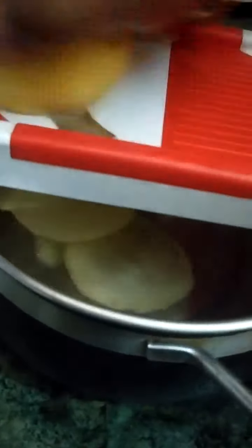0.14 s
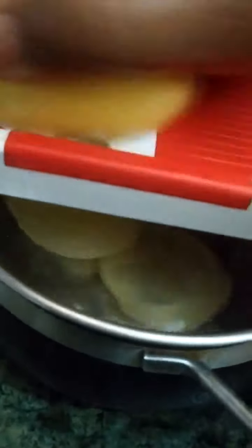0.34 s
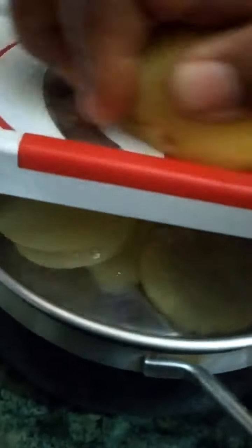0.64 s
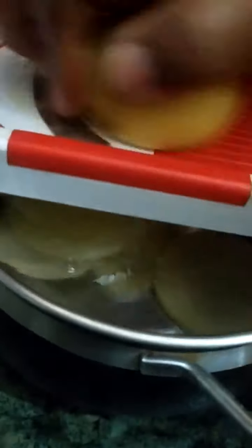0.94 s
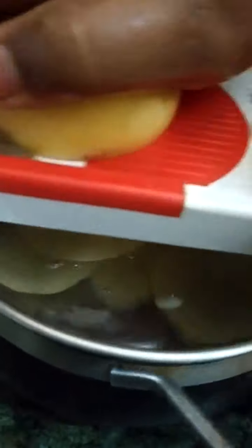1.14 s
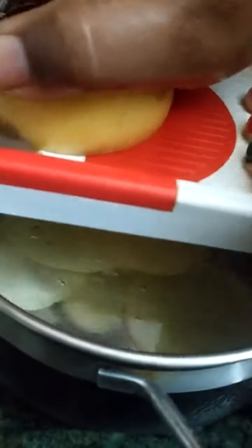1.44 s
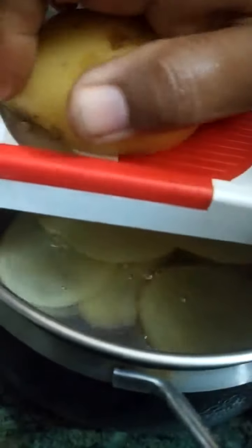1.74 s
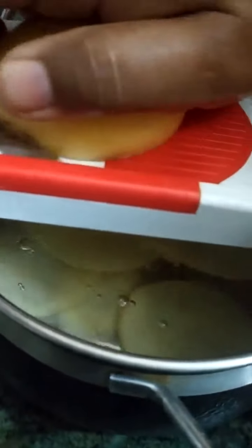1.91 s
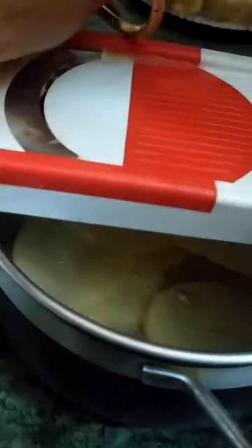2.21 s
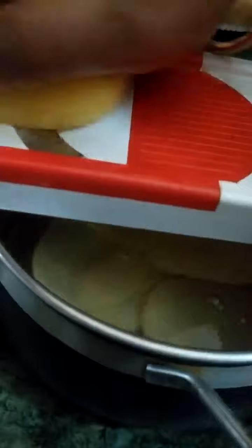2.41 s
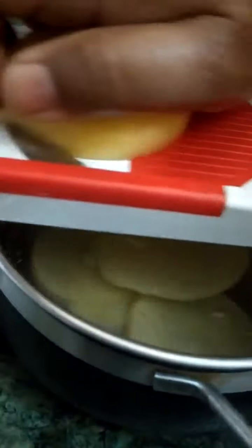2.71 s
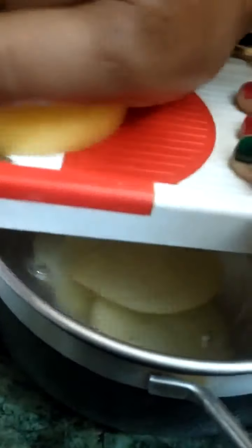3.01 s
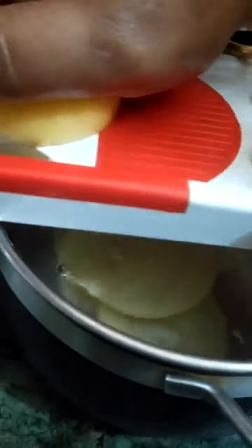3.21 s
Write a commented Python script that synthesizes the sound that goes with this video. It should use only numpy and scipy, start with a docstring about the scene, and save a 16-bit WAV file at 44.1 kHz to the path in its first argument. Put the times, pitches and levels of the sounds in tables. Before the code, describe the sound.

A potato is sliced on a plastic slicer, heard close in mono in a quiet kitchen. Wet, hollow slaps at about 0.15, 0.5 and 0.9 s each lead into a crisp, hissing rasp. Plastic clacks on the rim at 0.7 and 1.1 s; soft sliding follows. A cut rasps near 2.0 s, then double knocks, a weaker slap and short cuts at 2.6 and 3.0 s, fading into faint rubbing.

```python
"""In a kitchen, close to a mono microphone, a raw potato is sliced on a plastic mandoline across a steel pot.
The wet potato slaps the deck (noise bursts and damped modes), then slides on it (shaped grains with a low hum).
Each cut rasps as a dense run of bursting cells: random impulses shaped into hiss, fizz and tearing.
The slicer thumps under potato and hand, knocks on the rim (damped modes and clacks), and wet smacks snap.
A weak room answer and a quiet noise floor lie underneath."""
import sys
import numpy as np
from scipy import signal
from scipy.fft import rfft, irfft, next_fast_len
from scipy.io import wavfile
from scipy.ndimage import uniform_filter1d, map_coordinates

SR = 44100
rng = np.random.default_rng(int(sys.argv[2]) if len(sys.argv) > 2 else 0)


def wrap_up_sound(samples):
    """Save the sound to the file named by the first command line argument, as 16-bit audio."""
    columns = np.atleast_2d(samples).T
    # keep every value between -1 and 1, then stretch to whole-number steps
    tamed = np.clip(columns, -1, 1)
    steps = np.round(tamed * 32767).astype(np.int16)
    wavfile.write(sys.argv[1], SR, steps)


N = 147735
T = np.arange(N) / SR  # time [s]
FFT_SIZE = next_fast_len(N + 8192)
HZ = np.fft.rfftfreq(FFT_SIZE, 1 / SR)

# Low shaking of the slicer: (frequency [Hz], relative level [dB])
SHAKE_TONE = [(25, -14), (50, -13), (72, -5), (98, 6), (118, -11.5), (133, 1.5), (165, -28.5), (218, -2.5),
              (250, -14.5), (330, -13), (600, -89)]
# Hollow body of the slicer, driven by the potato: (frequency [Hz], relative level [dB])
BODY_TONE = [(150, -7.5), (340, -16.5), (470, -4.5), (650, -3.5), (1100, -11), (2500, -60)]
# Main resonance of that body: (frequency [Hz], width [Hz], lift [dB])
BODY_PEAK = [(810, 120, 12)]


def amp(db):
    """Decibels to gain."""
    return 10 ** (np.asarray(db) / 20)


def unit(x):
    """Scale to rms 1."""
    return x / np.sqrt(np.mean(x ** 2) + 1e-20)


def filtered(x, gain):
    """Multiply the spectrum of x by a gain on the frequency grid."""
    return irfft(rfft(x, FFT_SIZE) * gain, FFT_SIZE)[:N]


def coloured(x, tone, peaks=()):
    """Shape x by a tone curve and resonances, with the deepest bass removed, at rms 1."""
    hz_points, db_points = np.transpose(tone)
    shape_db = np.interp(np.log(HZ + 1), np.log(hz_points), db_points)
    for hz, width, lift in peaks:
        shape_db = shape_db + lift / (1 + (2 * (HZ - hz) / width) ** 2)
    bass_cut = HZ ** 2 / (HZ ** 2 + 20 ** 2)
    return unit(filtered(x, amp(shape_db) * bass_cut))


def noise():
    """White noise."""
    return rng.standard_normal(N)


def wobble(rate):
    """A smooth random curve, rate knots a second."""
    return map_coordinates(rng.standard_normal(2000), [T * rate], mode="wrap")


def grains(rate, spread_db):
    """Random one-sample impulses of either sign and uneven size, rate a second."""
    hits = rng.random(N) < rate / SR
    return hits * np.sign(noise()) * amp(spread_db * noise())


def patchy(x):
    """Narrow peaks and hollows drift through the spectrum, as reflections off the moving hand do."""
    depth_db = 3.5
    spectrum = signal.stft(x, nperseg=1024)[2]
    field = rng.standard_normal(spectrum.shape)
    for _ in range(2):
        field = uniform_filter1d(field, size=5, axis=0)  # across frequency
        field = uniform_filter1d(field, size=7, axis=1)  # across time
    gain = amp(depth_db * np.minimum(unit(field), 1.4))
    return unit(signal.istft(spectrum * gain, nperseg=1024)[1][:N])


def strike(s, rise, t60):
    """Envelope that swells up to time s and then dies away by 60 dB in t60."""
    swell = np.exp(np.minimum(T - s, 0) / rise)
    return swell * amp(-60 * np.maximum(T - s, 0) / t60)


def ring(s, modes, rise):
    """Damped modes set off at time s, each level a little random, sounding for half a second at most."""
    scatter_db = 1.2
    t = np.maximum(T - s, 0)
    on = (t > 0) & (t < .5)
    out, t = np.zeros(N), t[on]
    for hz, db, t60 in modes:
        decay = amp(db + scatter_db * rng.standard_normal() - 60 * t / t60)
        out[on] += decay * np.sin(2 * np.pi * hz * t) * (1 - np.exp(-t / rise))
    return out


def still_kitchen():
    """Steady, mostly low noise of the still kitchen."""
    # Tone of the noise: (frequency [Hz], relative level [dB])
    floor_tone = [(30, 13), (90, -10.5), (300, 1), (800, -13.5), (3000, -23.5), (16000, -55)]
    return amp(-65) * coloured(noise(), floor_tone)


def room_answer(x):
    """A short answer from the walls: decaying noise, thin in the bass."""
    t60_s, low_hz = .2, 320
    t = T[:SR // 2]
    tail = rng.standard_normal(len(t)) * amp(-60 * t / t60_s) * (t > .003)
    wet = signal.fftconvolve(x, tail / np.linalg.norm(tail))[:N]
    return filtered(wet, HZ ** 2 / (HZ ** 2 + low_hz ** 2))


def smacks():
    """Juice snaps as wet surfaces part: short bursts of bright noise."""
    # Small wet smacks: (time [s], level [dB])
    smack_hits = [(0.118, -38.5), (0.629, -25), (0.832, -35), (0.893, -43), (1.817, -49.5), (2.402, -45),
                  (2.129, -37), (2.574, -38), (3.286, -50)]
    # Their tone: (frequency [Hz], relative level [dB])
    smack_tone = [(1000, -16.5), (4000, -11.5), (6300, -3), (8000, -8.5), (12000, -5.5), (16000, -13)]
    envelope = sum(amp(db) * strike(s, rise=0.0017, t60=0.04) for s, db in smack_hits)
    return envelope * patchy(coloured(noise(), smack_tone))


def thumps():
    """Landings of the potato and pushes of the hand bend the slicer: low damped modes, tuned for each."""
    # Thumps: (time [s], pitch [Hz], level [dB], lift of the upper modes [dB])
    thump_hits = [(0.167, 98.7, -27.5, 10), (0.526, 100, -25.5, -1), (0.912, 102.2, -29, 9.5),
                  (2.328, 98.4, -37.5, 4.5), (2.461, 96.2, -32, -4), (2.606, 90, -37.5, -13),
                  (2.991, 91.3, -36.5, -14), (3.154, 99.5, -45, -8)]
    # Bending modes: (multiple of the pitch [ratio], relative level [dB], t60 [s])
    bending_modes = [(.76, -3.5, 0.29), (0.998, 0, 0.33), (1.33, -14, 0.22), (1.8, -14, 0.16),
                     (2.17, -6, 0.17), (2.65, -8.5, 0.047)]
    upper_hz = 120
    out = np.zeros(N)
    for s, pitch, db, upper_db in thump_hits:
        modes = []
        for multiple, level, t60 in bending_modes:
            hz = multiple * pitch
            modes.append((hz, level + upper_db * (hz > upper_hz), t60))
        out += amp(db) * ring(s, modes, rise=.003)
    return out


def knocks():
    """Plastic on the steel rim: a dry clack with a faint rattle over damped rings of body, deck and blade."""
    # Knocks: (time [s], body ring level [dB], deck ring level [dB], clack level [dB])
    knock_hits = [(.002, -34, -42, -43.5), (.131, -30, -33, -34), (.232, -31, -37, -37),
                  (.728, -20, -66, -22), (.7505, -27.5, -54, -30), (.982, -25, -33, -38),
                  (1.078, -23.5, -29.5, -27.5), (1.123, -31.5, -82, -55), (1.183, -40.5, -70, -75),
                  (1.295, -42.5, -45, -58), (1.785, -46, -50, -58), (2.058, -28, -30, -27),
                  (2.1305, -27, -27, -25), (2.1455, -33, -31.5, -33)]
    # Modes of slicer body, flat deck and steel blade: (frequency [Hz], relative level [dB], t60 [s])
    body_modes = [(733, -7.5, 0.083), (818, 1.5, 0.052)]
    deck_modes = [(1132, -16.5, 0.022), (1564, -7, 0.071), (2230, -1.5, 0.038), (2357, 0.5, 0.036)]
    blade_modes = [(4225, -3, 0.072), (7420, -3.5, 0.057), (9830, 2, 0.037)]
    # Tone of the clack: (frequency [Hz], relative level [dB])
    clack_tone = [(300, -6), (600, -22), (800, 7), (1150, 5), (1800, -2), (2350, 10), (2800, 1.5),
                  (3200, 6.5), (4400, 1.5), (5400, -4), (7000, 0.5), (10000, -33), (16000, -43)]
    blade_db, rattle_db = -9.5, -23.5  # both relative to the clack
    rings, clack = np.zeros((2, N))
    for s, body_db, deck_db, clack_db in knock_hits:
        rings += amp(body_db) * ring(s, body_modes, rise=0.00074)
        rings += amp(deck_db) * ring(s, deck_modes, rise=0.00085)
        rings += amp(clack_db + blade_db) * ring(s, blade_modes, rise=0.00058)
        rattle = amp(rattle_db) * strike(s, rise=0.0003, t60=0.27)
        clack += amp(clack_db) * (strike(s, rise=0.00057, t60=0.026) + rattle)
    return rings + clack * patchy(coloured(noise(), clack_tone))


def thud(s):
    """A tone falling from a knock to a low boom, as a bending wave from the impact spreads through the slicer."""
    start_hz, end_hz, fall_s, t60_s = 854, 102.6, 0.00677, .12
    dip_hz, dip_width_hz = 325, 110  # the thud is thin around this frequency
    t = np.maximum(T - s, 0)
    cycles = end_hz * t + (start_hz - end_hz) * fall_s * (1 - np.exp(-t / fall_s))
    tone = np.sin(2 * np.pi * cycles) * amp(-60 * t / t60_s) * (1 - np.exp(-t / 0.0018))
    b, a = signal.iirnotch(dip_hz, dip_hz / dip_width_hz, SR)
    return signal.lfilter(b, a, tone)


def slaps():
    """The potato lands: a wet crack with a splashy tail, soft flesh noise, a hollow clop and a falling thud."""
    # Landings: (time [s], wet slap [dB], hollow clop [dB], falling thud [dB], lift of upper clop modes [dB])
    landings = [(0.1573, -17.5, -14.5, -21, -2.5), (0.5205, -19.5, -18.5, -23, -8),
                (0.9062, -20, -20.5, -20.5, -7), (2.4507, -28.5, -34.5, -35, 13)]
    # Tones of the wet crack and of soft flesh hitting plastic: (frequency [Hz], relative level [dB])
    wet_tone = [(300, -31), (1300, 7), (2300, -3), (2800, -3.5), (3500, 0), (5400, -3.5), (7500, 0),
                (10000, 4.5), (12000, -7), (16000, -9.5)]
    flesh_tone = [(50, -34), (130, 6), (220, 2), (450, 6.5), (900, 10.5), (1400, -33), (2200, -1),
                  (5000, -38)]
    # Modes of the hollow clop: (frequency [Hz], relative level [dB], t60 [s])
    clop_modes = [(439, -19, 0.27), (583, -19, 0.016), (817, -1, 0.055), (1397, -8, 0.046)]
    rise_s, splash_db, flesh_db = 0.0018, -19, -13.5  # levels relative to the wet slap
    upper_hz, lead_s = 1150, 0.00164  # clop and thud start just ahead of the crack's peak
    wet, flesh, clop = np.zeros((3, N))
    for s, wet_db, clop_db, thud_db, upper_db in landings:
        splash = amp(splash_db) * strike(s, rise_s, t60=0.21)
        wet += amp(wet_db) * (strike(s, rise_s, t60=0.024) + splash)
        flesh += amp(wet_db + flesh_db) * strike(s, rise=0.00032, t60=0.19)
        modes = [(hz, db + upper_db * (hz > upper_hz), t60) for hz, db, t60 in clop_modes]
        clop += amp(clop_db) * ring(s - lead_s, modes, rise=0.0013)
        clop += amp(thud_db) * thud(s - lead_s)
    crack = wet * patchy(coloured(noise(), wet_tone))
    return crack + flesh * coloured(noise(), flesh_tone) + clop


def sliding():
    """The wet cut face rubs over the ribbed deck; the body hums unevenly and one judder rings."""
    # Course of the sliding, before the trim of each layer: (time [s], level [dB])
    slide_course = [(0, -45.5), (.04, -46.5), (.14, -39.5), (.22, -41), (.4, -49.5), (.46, -46),
                    (.5, -50.5), (.58, -48.5), (.875, -47.5), (.893, -32), (.94, -52), (1.17, -47.5),
                    (1.26, -65.5), (1.3, -44.5), (1.35, -47), (1.42, -48), (1.49, -66.5), (1.56, -52.5),
                    (1.7, -56), (1.75, -64), (1.83, -51), (1.87, -51.5), (1.93, -45.5), (2.1, -46.5),
                    (2.2, -52.5), (2.29, -47.5), (2.435, -51.5), (2.49, -47), (2.56, -56), (2.66, -55.5),
                    (2.785, -47.5), (2.82, -42), (2.95, -51), (3.1, -52.5), (3.22, -55), (3.26, -64),
                    (3.35, -58)]
    # Tone of the rub: (frequency [Hz], relative level [dB])
    rub_tone = [(200, -13), (500, -12.5), (1200, -4.5), (2400, -2.5), (2800, -5), (4200, -4.5), (5400, -7),
                (6800, -3), (9800, -1), (12000, -8), (16000, -15.5)]
    rub_db, stick_db = -4, -9.5  # trims of rub and hum
    rumble_db, rumble_follows = -55, 0.9  # shaking follows most of the course's rise and fall in dB
    db = np.interp(T, *np.transpose(slide_course))
    rub = patchy(coloured(grains(4000, spread_db=3), rub_tone)) * amp(db + rub_db + 2.9 * wobble(60))
    # The body hums in fits as the potato sticks and slips.
    hum = coloured(noise(), BODY_TONE, BODY_PEAK) * amp(db + stick_db + 1.5 * wobble(40))
    judder = ring(2.787, [(223, -43.5, 0.76)], rise=0.0077)  # mode: Hz, dB, t60 in s
    shaking = coloured(noise(), SHAKE_TONE) * amp(rumble_db + rumble_follows * (db - db.mean()))
    return rub + hum + judder + shaking


def cut_levels():
    """Gains of hiss, fizz, tearing, body and shaking: the blade bites, its load changes mid-cut, it lets go."""
    # Passes through the blade: (time at half the attack [s], length [s], attack [s], level [dB],
    # tearing flesh over that [dB], hollow body over that [dB], swell at the potato's widest [dB],
    # change from start to end [dB], release [dB/s])
    cuts = [(0.236, 0.11, 0.017, -36, -9, -6.5, 6.5, -1.5, 480),
            (0.603, 0.15, 0.0038, -38.5, -4.5, -3.5, 8.5, -3, 324),
            (0.983, 0.11, 0.011, -33, -9.5, -6.5, -3.5, -5, 255),
            (1.961, 0.12, 0.0087, -41.5, -3, -5.5, 10, -1, 398),
            (2.571, 0.068, 0.0034, -36.5, -5, -6.5, 1, -7, 244),
            (2.975, 0.068, 0.0093, -42.5, -3.5, -3, 6.5, 0.5, 468)]
    flatness = 3.45  # exponent: higher holds the swell longer
    fizz_db, fizz_swell = -16.5, 2.34  # finest spray of cells, changing more than the hiss
    crunch_swell = 0.29  # share of the swell in tearing and body
    shake_db, shake_swell = -8.5, 0.59
    levels = np.zeros((5, N))
    for s, length, attack, db, flesh_db, body_db, swell_db, change_db, release in cuts:
        progress = np.clip((T - s) / length, 0, 1)
        swell = swell_db * (1 - abs(2 * progress - 1) ** flatness)
        push = crunch_swell * swell
        bite = np.clip((T - s) / attack + .5, 0, 1)
        letting_go_db = release * np.maximum(T - s - length, 0)
        force = amp(db + change_db * progress - letting_go_db) * bite
        levels += force * amp([swell, fizz_swell * swell + fizz_db, push + flesh_db,
                               push + body_db, shake_swell * swell + shake_db])
    return levels


def burst_cells():
    """Dense bursting cells at the edge, with coarse fibres snapping more rarely among them."""
    spread_db = 2.5
    fibres = amp(-11) * unit(grains(450, spread_db))
    return lambda: unit(grains(13000, spread_db)) + fibres  # new cells each call, same fibres


def blade():
    """Cells burst and fibres snap at the edge; tearing flesh drives deck and body and shakes the slicer."""
    # Spectra of bursting cells, of their finest spray and of tearing flesh: (frequency [Hz], relative level [dB])
    hiss_tone = [(500, -39), (2000, -7), (3300, -10), (4500, 5), (5400, -3), (7000, 4), (9700, 2.5),
                 (11000, -2), (13000, -1), (16000, -18)]
    fizz_tone = [(4000, -43), (8000, -15), (10000, 2), (13000, -1), (16000, -0.5)]
    crunch_tone = [(400, -51), (1150, -14.5), (2400, -7), (2800, -11), (3200, -3.5), (4500, -24),
                   (7000, -40), (16000, -32)]
    # Deck resonances over the tearing: (frequency [Hz], width [Hz], lift [dB])
    deck_peaks = [(1530, 200, 3), (2380, 220, 6)]
    cells = burst_cells()
    waver = amp(.6 * wobble(140))
    hiss = patchy(coloured(cells(), hiss_tone)) * waver
    fizz = patchy(coloured(cells(), fizz_tone)) * waver
    crunch = patchy(coloured(cells(), crunch_tone, deck_peaks)) * amp(1.5 * wobble(120))
    body = coloured(cells(), BODY_TONE, BODY_PEAK)
    shaking = coloured(noise(), SHAKE_TONE)
    return np.sum(cut_levels() * [hiss, fizz, crunch, body, shaking], axis=0)


def scene():
    """All sounds of the slicer in the room, alike in both channels."""
    near = smacks() + thumps() + knocks() + slaps() + sliding() + blade()
    mono = still_kitchen() + amp(-12) * room_answer(near) + near
    return np.array([mono, mono])


def record(dry):
    """The small microphone loses the deepest bass; the recorder keeps nothing above its band limit."""
    low_cut_hz, top_hz = 53, 16000
    bass_cut = signal.butter(2, low_cut_hz, "high", fs=SR, output="sos")
    dry = signal.sosfilt(bass_cut, dry)
    return np.array([filtered(channel, HZ < top_hz) for channel in dry])


dry = scene()
out = record(dry)
wrap_up_sound(out)
```